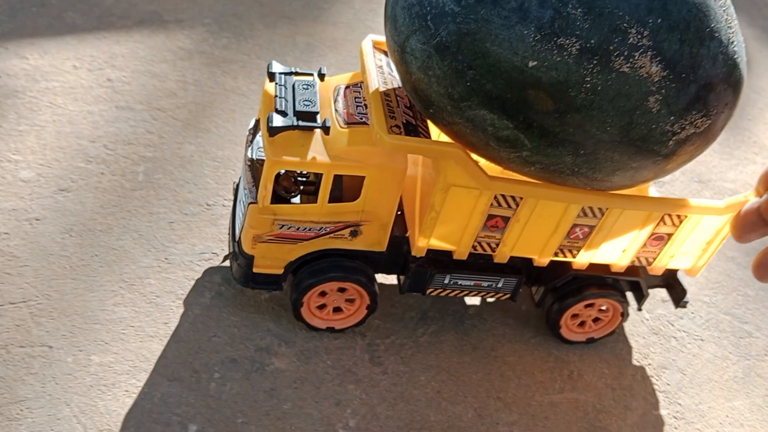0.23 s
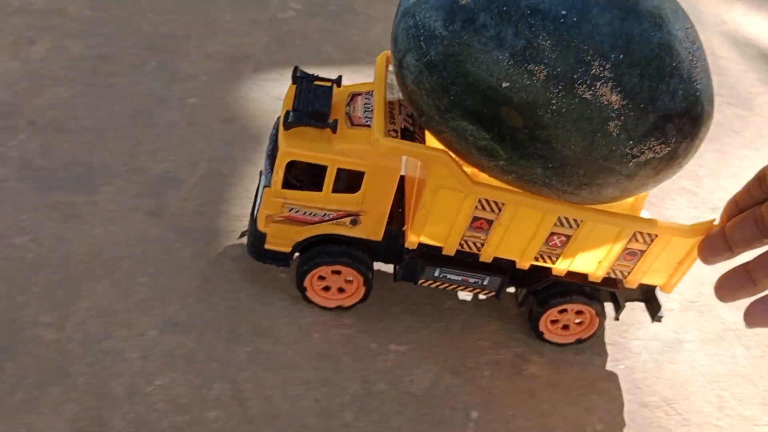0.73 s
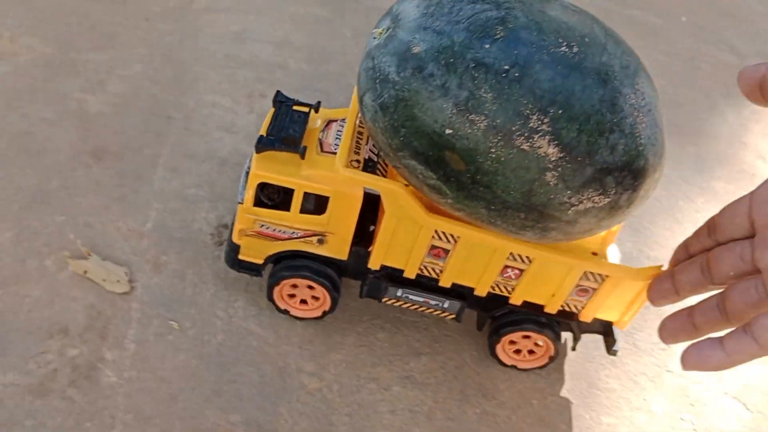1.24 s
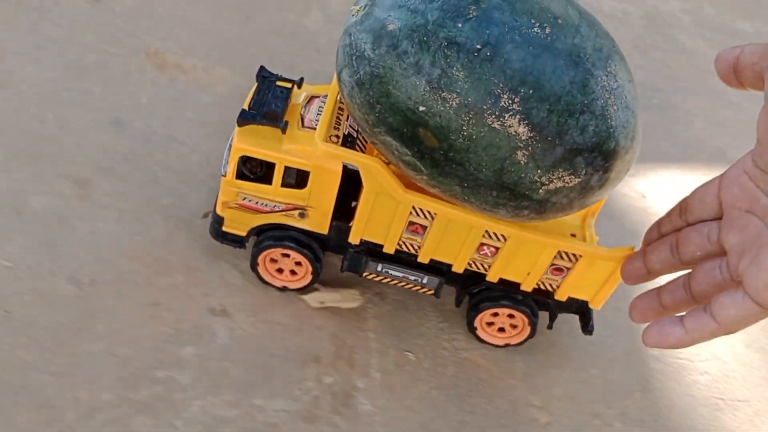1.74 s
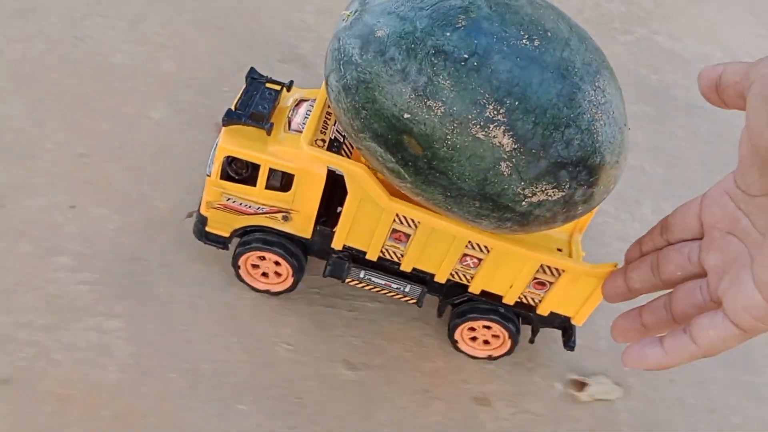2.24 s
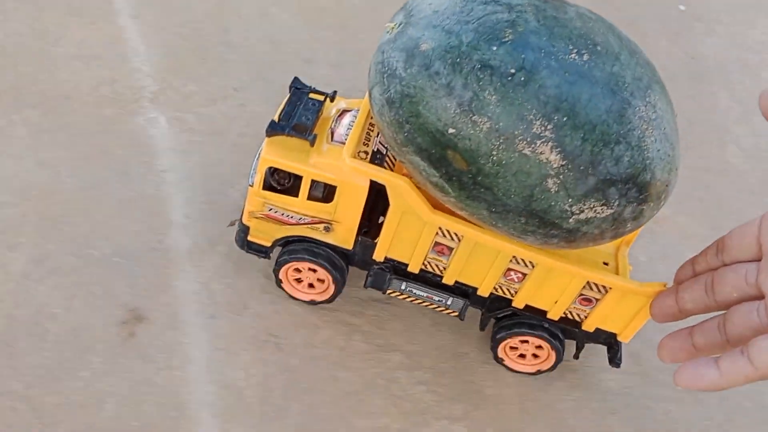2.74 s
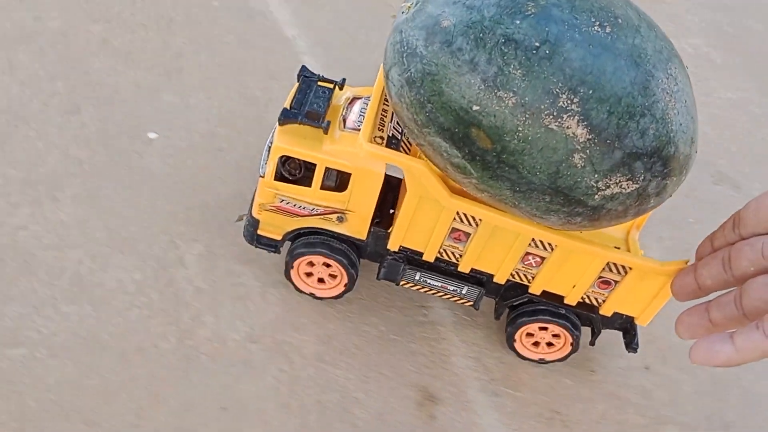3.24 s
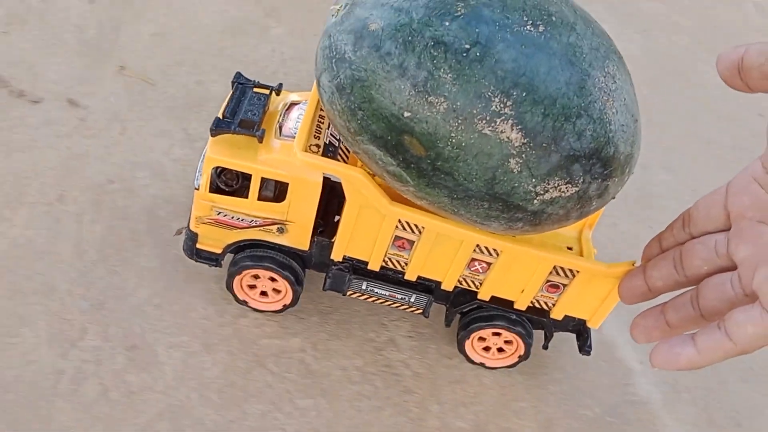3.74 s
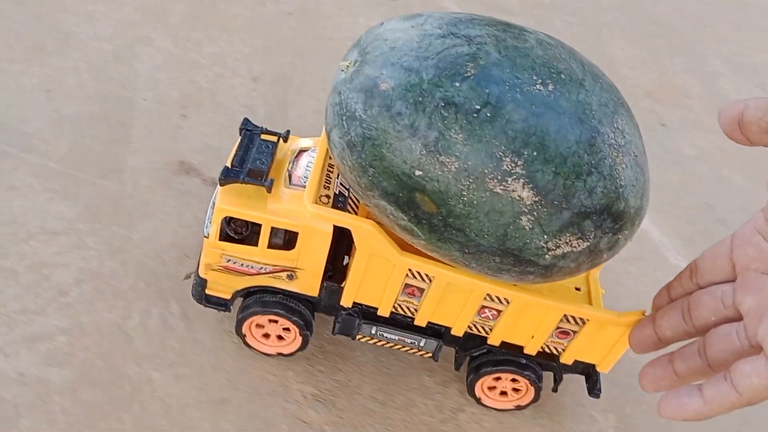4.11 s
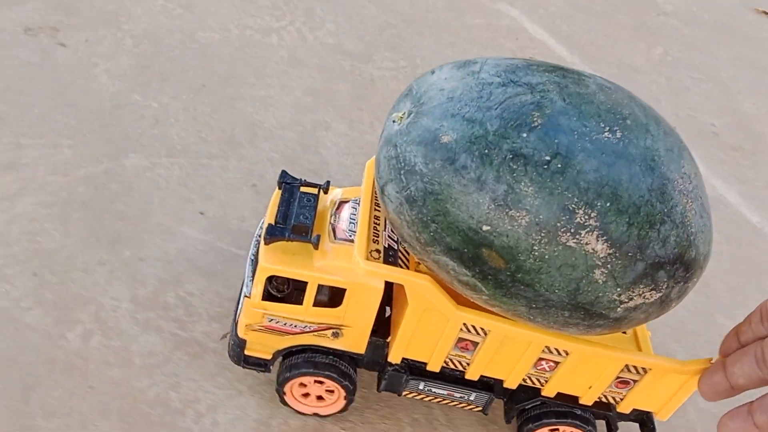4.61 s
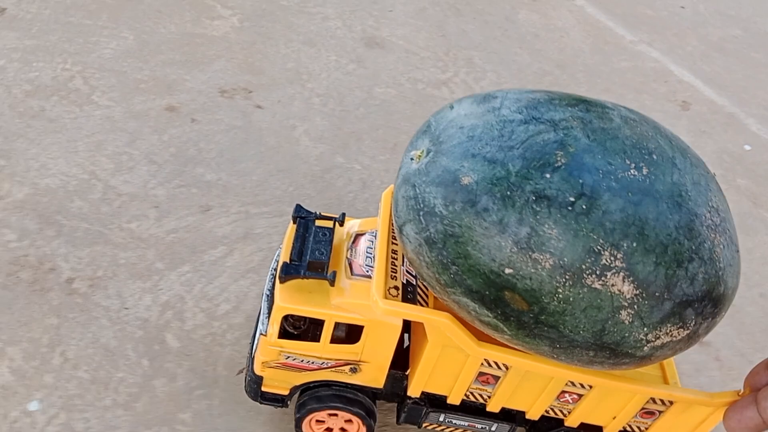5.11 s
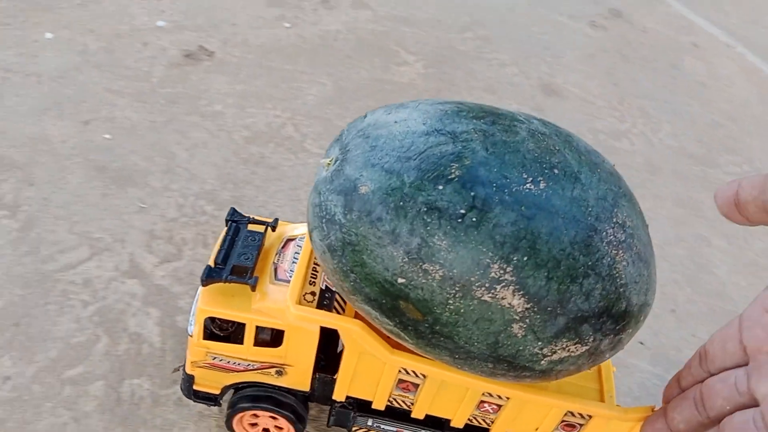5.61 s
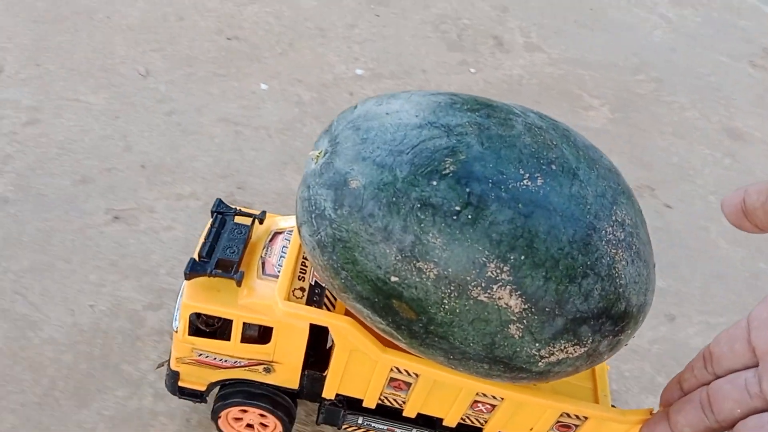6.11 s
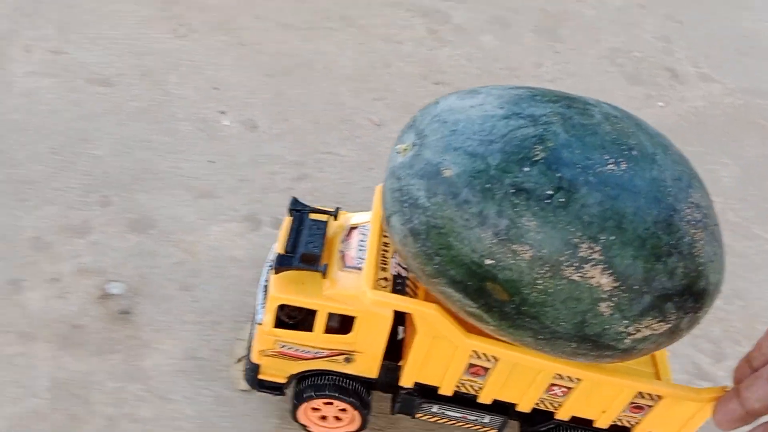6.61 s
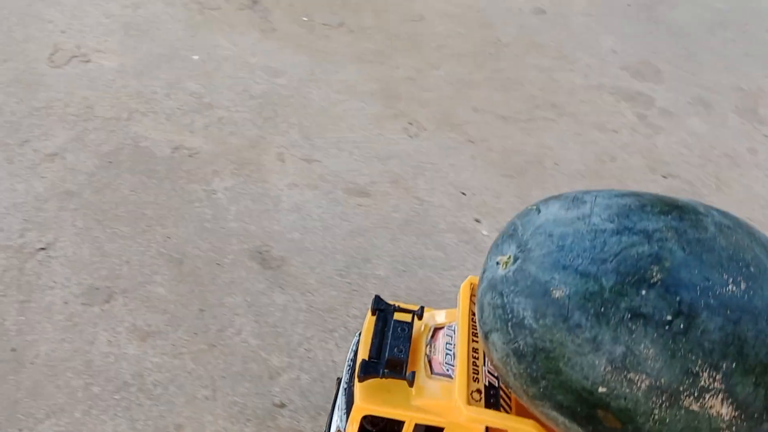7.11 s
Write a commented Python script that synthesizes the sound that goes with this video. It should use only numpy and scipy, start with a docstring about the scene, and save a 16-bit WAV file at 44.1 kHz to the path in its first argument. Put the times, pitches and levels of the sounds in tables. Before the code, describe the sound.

Rough, dry rolling of hard small wheels on sandy concrete, heard very close and mono. Several short scrapes and bumps come first, then over two seconds of nearly continuous clatter with tiny catches, a quiet gap with faint ticks, another second of strong rolling ending in a hard knock, and a few last scrapes. The hollow plastic body buzzes in the middle pitches, with quiet outdoor air behind.

```python
"""A loaded plastic toy truck is pushed by hand over gritty concrete, close to a phone, in short uneven runs.
Random jolts and single larger bumps ring the resonances of the wheels and the hollow body.
Sand crunches under the treads as shaped noise; single grains crack in short bursts.
Faint ticks of loose grains and quiet outdoor air, both shaped noise, fill the pauses."""
import sys
import numpy as np
from scipy import signal
from scipy.fft import rfft, irfft, next_fast_len
from scipy.io import wavfile
from scipy.ndimage import uniform_filter1d, map_coordinates

SR = 44100
rng = np.random.default_rng(int(sys.argv[2]) if len(sys.argv) > 2 else 0)


def master(y):
    """Save y as 16-bit WAV."""
    cut = np.clip(np.atleast_2d(y).T, -1, 1)
    pcm = np.round(cut * 32767)  # scale
    wavfile.write(sys.argv[1], SR, pcm.astype(np.int16))


def how_loud(loudness_db):
    """Turn decibels into a plain amplitude multiplier (0 dB gives 1, 20 dB gives 10)."""
    steps = np.asarray(loudness_db, float) / 20
    return 10 ** steps


N = 324135  # length in samples

# runs of rolling, and short quieter tails just after some of them:
# (start [s], length [s], level at full speed before pressure [dB], time to gather speed [s])
RUNS = [(0.0, 0.023, -40, 0.00037), (0.039, 0.021, -44, 0.0082), (0.064, 0.093, -38.5, 0.024),
        (0.171, 0.12, -44, 0.018), (0.263, 0.067, -36, 0.0093), (0.318, 0.1, -38, 0.044),
        (0.437, 0.27, -39, 0.026), (0.711, 0.025, -41, 0.011), (0.746, 0.17, -40, 0.013),
        (0.937, 0.13, -40.5, 0.031), (1.108, 0.1, -50.5, 0.031), (1.212, 0.068, -46.5, 0.032),
        (1.267, 0.24, -41, 0.027), (1.552, 0.05, -62.5, 0.0094), (1.636, 0.066, -40, 0.029),
        (1.802, 0.19, -46.5, 0.041), (1.995, 0.043, -59.5, .005), (2.051, 2.38, -39.5, 0.035),
        (4.431, 0.035, -52, 0.003), (4.53, 0.032, -63, 0.018), (4.634, 0.083, -50, 0.012),
        (4.894, 0.089, -50.5, 0.022), (4.996, 0.028, -56, 0.0077), (5.012, 1.051, -36.5, 0.11),
        (6.063, 0.087, -51.5, 0.006), (6.148, 0.29, -39, 0.03), (6.457, 0.036, -66, 0.0033),
        (6.599, 0.089, -58.5, 0.0086), (6.724, 0.29, -47, 0.02), (7.149, 0.14, -37, 0.067),
        (7.3, 0.069, -49, 0.01)]
# the wheels catch for a moment: (middle [s], drop [dB], length [s])
STALLS = [(1.49, 8.5, 0.036), (2.208, 8.5, 0.021), (2.425, 10, 0.017), (3.117, 13.5, 0.045),
          (3.64, 6, 0.025), (3.712, 12.5, 0.049), (3.883, 8, 0.02), (4.098, 10, 0.023), (5.805, 10, 0.026),
          (6.001, 9.5, 0.02)]
# how hard the truck is pressed, added to the rolling level: (time [s], change [dB])
PRESSURE = [(0, 1.5), (2.3, 3.5), (2.75, -0.5), (3.05, 1), (3.24, -2), (3.3, 3.5), (3.65, 3.5), (3.9, 2.5),
            (4.17, -3), (4.38, 0.5), (5.4, 0.5), (6.05, -0.5), (6.45, 1), (7.35, 3)]
# single larger bumps: (time [s], strength [dB])
KNOCKS = [(0.014, -28), (.049, -42), (.102, -37), (0.208, -38), (0.228, -35), (.251, -30), (0.41, -27),
          (0.416, -20.5), (.475, -22), (0.695, -20.5), (0.756, -30), (0.809, -24), (1.304, -27),
          (1.69, -37), (1.841, -44), (4.466, -55), (4.665, -37), (4.808, -50), (4.847, -46), (4.973, -31),
          (5.017, -53), (5.09, -50), (6.021, -33), (6.0575, -19), (6.121, -50), (6.146, -34), (6.183, -29),
          (7.182, -32.5), (7.224, -26)]

# resonances of each part: (pitch [Hz], width of one pass [Hz], relative strength [dB])
RUMBLE = [(76.8, 27, 10), (103.7, 19.4, 6), (142, 79, 5.5)]
FRAME = [(249.8, 52, 10)]
CHASSIS = [(349, 220, -8), (458, 270, -7), (499.4, 66.5, 9), (620.4, 133, 1.5)]
CAB = [(667, 94, -0.5), (735, 164, -2.7)]
WHEELS = [(963, 162, 0.99), (1091, 183, -2.6)]
BED = [(1228, 280, -0.47), (1345, 241, 1), (1515, 262, -3.5)]
PANELS = [(1727, 530, 1), (2087, 350, -3.2)]
TAILGATE = [(2292, 183, 6), (2487, 340, -4.5)]
SKIN = [(2730, 420, 2.5), (2960, 240, -1.5), (4046, 350, -9.5)]
FENDERS = [(3206, 237, 7.5), (3645, 250, -1.5), (4310, 570, -11)]

# usual share of a jolt taken by (frame [dB], chassis [dB], wheels [dB], bed [dB])
USUAL_SHARES = [-26.5, -12.5, -7, -3.5]
# slow changes of colour, added to the usual shares and to the sand:
# (time [s], lean from wheels to bed, applied in part [dB], frame [dB], chassis [dB], sand [dB])
COLOUR = [(0, -2, -3, -7, -3), (.12, -25, -18, -9, -4), (.22, 20, -5, -8, -3), (.4, 2, -9.5, -5, -3.5),
          (.6, 6.5, -6, -9.5, -1), (.85, 2, -15, -4, 0.5), (1.2, -8, -11, -7, -1.5),
          (1.45, -25, -6, -0.5, 0), (1.9, -22, -6, -9, 0.5), (2.2, 10.5, -8.5, -3, -1.5),
          (2.6, 7, -6.5, 8.5, 0), (3.0, -25, 9.5, -1, 0), (3.2, -15, -7, -1, -0.5), (3.6, 21.5, 3.5, 2, -2),
          (4.0, 4.5, 0, -2, -1), (4.4, -22, 9.5, 8.5, -1.5), (4.8, -9, -17, -15, -0.5),
          (5.15, 6, -10, 2, -2), (5.6, 17.5, 14, 1, -1), (5.95, -19, 7.5, 3, -2.5), (6.4, -28, 3, 2.5, 1),
          (6.63, -18, -16, 8.5, 5.5), (6.8, -8, 12, 4, 7.5), (7.05, 18, 3, 7.5, 5), (7.35, 19, 9, -6.5, 0)]
# share of the low rumble in a jolt: (time [s], share [dB])
RUMBLE_SHARE = [(0, -29), (.9, -37), (1.7, -40), (2.2, -26.5), (2.6, -33), (3.0, -17.5), (3.3, -45),
                (3.6, -25.5), (4.1, -37), (5.0, -17), (5.4, -30.5), (6.0, -20.5), (6.8, -17), (7.35, -41)]
# share of the cab, strong in the first runs, faint in the middle, strongest near 6.85 s: (time [s], share [dB])
CAB_SHARE = [(0, -13.5), (.7, -11.5), (1.2, -15), (2, -26), (6.5, -32), (6.85, -7.5), (7.35, -35)]
# shares of the upper parts: (time [s], panels [dB], tailgate [dB], fenders [dB])
UPPER_SHARES = [(0, -13.5, -21, -18.5), (1, -9, -14.5, -16), (1.6, -8.5, -5.5, -16.5),
                (2.2, -12, -9.5, -22.5), (2.8, -12.5, -9.5, -17.5), (3.05, -4.5, -8, -17.5),
                (3.5, -15.5, -10.5, -21), (4.3, -10, -9.5, -16.5), (4.7, -8, -9, -17),
                (4.95, -4.5, -17.5, -14.5), (5.5, -13.5, -9.5, -17), (6.1, -9, -13.5, -19),
                (6.4, -5, -11.5, -19), (6.65, -0.5, -2.5, -6), (6.9, -0.5, -7, -10),
                (7.35, -12.5, -19.5, -21)]
# random swing of each part in the order used in body(); low parts knock in lumps: (swing [dB], ...)
LUMPS_DB = [4.3, 3.9, 4.2, 4.0, 0.84, 0.88, 1.33, 1.2, 2.4, 2.36]

# colour of the sand: (pitch [Hz], relative level [dB])
SAND_COLOUR = [(3100, -3), (5200, -6.5), (5800, -5), (6350, -7.5), (6700, 2.5), (8500, -1), (10300, 6),
               (11200, 0), (11800, 1.5), (13200, 0.5), (14000, -16), (15400, -4.5)]
# extra brightness of the crunches: (pitch [Hz], relative level [dB])
CRUNCH_COLOUR = [(7000, 2.5), (11500, 7.5)]
# grains that crack: (time [s], strength [dB], brightest pitch [Hz])
CRACKS = [(0.3935, -41, 10000), (0.578, -30.5, 8640), (0.599, -33, 6600), (0.6843, -29, 7300),
          (1.302, -29, 12300), (1.3628, -36, 11700), (1.787, -36.5, 8600), (2.436, -34, 10300),
          (2.615, -28, 12000), (2.68, -16, 12800), (2.7953, -29, 7600), (3.018, -32, 10900),
          (3.217, -24, 11200), (3.898, -35, 10500), (4.551, -25.5, 7560), (4.722, -36, 7800),
          (5.473, -30, 12500), (5.479, -22.5, 7800), (5.488, -23.5, 7040), (5.821, -35, 10100),
          (6.003, -34, 10300), (6.331, -21.5, 11700), (6.633, -30.5, 12500), (7.206, -30, 12600)]
# colour of the cracks: (pitch [Hz], gain [dB])
CRACK_COLOUR = [(2000, -21), (4000, -40), (4800, -9), (5500, -10.5), (7200, -4.0), (15000, -10.5)]
# colour of the ticks: (pitch [Hz], relative level [dB])
TICK_COLOUR = [(500, -12), (1700, 3.0), (3300, -17), (6500, -22), (9000, 0), (12500, -3.5), (15000, -14)]
# colour of the air: (pitch [Hz], relative level [dB])
AIR_COLOUR = [(24, -14), (40, 0), (126, 5), (343, -9), (1580, -4.5), (5230, -70), (6550, -50),
              (7060, -13.5), (9060, -13), (12500, -22), (15700, -27)]

USUAL_ROLLING_DB = -41.5  # the rolling level at which sand and skin have their usual strength
SAND_DB, SAND_FOLLOWS = -61.5, 0.95  # usual sand setting, dB per dB of rolling


def unit(x):
    """Scales x to an rms (average strength) of 1."""
    return x / np.sqrt(np.mean(x ** 2) + 1e-20)


def curves(rows):
    """Joins timed points by lines: one curve for each column after the time."""
    s, *cols = np.transpose(rows)
    return [np.interp(np.arange(N) / SR, s, c) for c in cols]


def wobble(rate):
    """A smooth random curve of rms 1 with rate knots a second."""
    knots = rng.standard_normal(N // 100)
    return unit(map_coordinates(knots, [np.arange(N) * rate / SR]))


def filtered(x, response):
    """Multiplies the spectrum of x by a response that depends on frequency."""
    m = next_fast_len(N + 8192)  # spare room for the ringing
    return irfft(rfft(x, m) * response(np.fft.rfftfreq(m, 1 / SR)), m)[:N]


def coloured(x, points):
    """Filters x through (pitch [Hz], gain [dB]) points joined on a log pitch axis."""
    f, db = np.transpose(points)
    return filtered(x, lambda hz: how_loud(np.interp(np.log(hz + 1), np.log(f), db)))


def patches(x, size, hz_bins, frames, depth_db):
    """Makes x uneven with a random field of gain over pitch and time."""
    z = signal.stft(x, nperseg=size)[2]
    field = rng.standard_normal(z.shape)
    field = uniform_filter1d(field, size=hz_bins, axis=0)
    field = uniform_filter1d(field, size=frames, axis=1)
    return signal.istft(z * how_loud(depth_db * unit(field)), nperseg=size)[1][:N]


def impacts(per_second, spread_db):
    """Random single-sample hits: most are small, a few are much larger."""
    when, size, sign = rng.random((3, N))
    sizes = how_loud(-spread_db * np.log(size + 1e-4))
    return (when < per_second / SR) * sizes * np.sign(sign - .5)


def rolling():
    """Rolling level in dB: each row of RUNS builds up and then falls fast; it drops where the wheels catch."""
    t = np.arange(N) / SR
    power = how_loud(-73 + 4 * wobble(23)) ** 2  # wandering level at rest
    for s, length, full_db, gather in RUNS:
        near = slice(max(0, round(s * SR)), round((s + length + .3) * SR))
        speed = 1 - np.exp(-np.clip(t[near] - s, 0, length) / gather)
        since_end = np.maximum(t[near] - s - length, 0)
        fall = how_loud(-1052 * since_end)  # dB per second
        rattle = how_loud(-32.5 - 390 * since_end)  # the load rattles on after a stop
        power[near] += (speed ** 2.41 * how_loud(full_db) * (fall + rattle)) ** 2
    level_db = 10 * np.log10(power) + curves(PRESSURE)[0]
    for s, drop_db, length in STALLS:
        near = slice(max(0, round((s - .1) * SR)), round((s + .1) * SR))
        # the fourth power gives the dip a flat bottom
        level_db[near] -= drop_db * np.exp(-.7 * (2 * (t[near] - s) / length) ** 4)
    return level_db


def knocks():
    """Each larger bump gives the truck one sharp blow with a short, fading judder behind it."""
    blows, t = np.zeros(N + SR), np.arange(SR // 80) / SR
    judders = rng.standard_normal((len(KNOCKS), len(t)))
    for (s, db), judder in zip(KNOCKS, judders):
        blow = np.where(t > 0, 0.072 * judder, 1) * np.exp(-t / 0.0031)
        blows[round(s * SR):][:len(t)] += how_loud(db + 11) * blow  # the blow is larger than the ring it starts
    return blows[:N]


def modes(part):
    """A part's resonances, each applied twice for steep sides; neighbours swing in opposite phase."""
    norm = np.sqrt(sum(how_loud(db) ** 2 * width for hz, width, db in part))

    def mode(sign, hz, w, db):
        return lambda f: sign * how_loud(db) / norm * (1j * f * w / (hz * hz - f * f + 1j * f * w)) ** 2

    return [mode((-1) ** k, *row) for k, row in enumerate(part)]


def body(rolling_db, shares_db):
    """Bumps jolt all parts at once; as wheels turn and the load rocks, the resonances drift in strength."""
    jolts = unit(impacts(900, spread_db=1.0)) + 0.6 * rng.standard_normal(N)
    jolts = patches(jolts, size=1024, hz_bins=2, frames=12, depth_db=2.8)
    jolts = unit(patches(jolts, size=1024, hz_bins=2, frames=4, depth_db=2))
    usual = how_loud(41.5) * np.sqrt(sum(how_loud(db) ** 2 for db in shares_db))

    parts = [RUMBLE, FRAME, CHASSIS, WHEELS, BED, CAB, PANELS, TAILGATE, FENDERS, SKIN]
    shares_db = [db + lump_db * wobble(11) for db, lump_db in zip(shares_db, LUMPS_DB)]
    rings = []
    for part, share_db in zip(parts, shares_db):
        for mode in modes(part):
            gain = how_loud(share_db + 2 * wobble(16))  # each resonance also swells alone as the load shifts
            rings.append((mode, gain))

    def ring(x):
        return sum(filtered(x * gain, mode) for mode, gain in rings)

    # hold back part of the loudness swell, so the drift changes colour more than loudness
    swell = np.sqrt(np.abs(uniform_filter1d((ring(jolts) / usual) ** 2, size=round(0.048 * SR))))
    jolts = jolts + 0.85 * unit(impacts(450, spread_db=2.2))  # coarse grains strike sharply
    jolts = jolts * (unit(swell) + 0.12) ** -0.7 * how_loud(0.78 * wobble(110))
    return how_loud(38.5) * ring(jolts * how_loud(rolling_db) + knocks())


def crunches():
    """Tread lugs bite at uneven gaps; each bite is a short puff of noise from shearing sand."""
    t = np.arange(SR // 50) / SR
    lugs = np.zeros(N)
    gap, size = rng.gamma(3, size=(2, 1500))  # gaps seldom come close to zero
    when = np.cumsum(gap * 0.0041 * SR).astype(int)
    lugs[when[when < N]] = np.minimum(size[when < N], 6)
    puff = (t / .0016) * np.exp(-t / 0.0017)
    puffs = unit(signal.fftconvolve(lugs, puff)[:N])
    noise = patches(rng.standard_normal(N) * puffs, size=128, hz_bins=5, frames=4, depth_db=3)
    return unit(coloured(noise, CRUNCH_COLOUR))


def sand(level_db):
    """A steady scrape of noise under short, brighter crunches, each with its own colour."""
    bright_crunches = crunches()
    scrape = patches(rng.standard_normal(N), size=512, hz_bins=3, frames=16, depth_db=2.4)
    grit = unit(scrape) + 1.23 * bright_crunches
    low = filtered(grit, lambda hz: hz < 6500)
    # the part below 6500 Hz gets strong random patches of gain and falls faster as the level drops
    patchy_low = unit(patches(low, size=256, hz_bins=1, frames=24, depth_db=5))
    low_gain = how_loud(0.64 * (level_db - SAND_DB)) * np.std(low)
    grit = grit - low + low_gain * patchy_low
    return how_loud(level_db + 2.5) * unit(coloured(grit, SAND_COLOUR))


def cracks():
    """A grain splits in a noise burst of a few milliseconds, stressed near its own pitch."""
    out, t = np.zeros(N + SR), np.arange(SR // 40) / SR
    shape = unit((t / .001) * np.exp(-t / 0.002))
    noise = rng.standard_normal((len(CRACKS), 2, len(t)))
    for (s, db, hz), (broad, narrow) in zip(CRACKS, noise):
        b, a = signal.iirpeak(min(hz, SR / 2.2), 7, SR)
        burst = 0.79 * unit(broad) + unit(signal.lfilter(b, a, narrow))
        out[round(s * SR):][:len(t)] += how_loud(db - 25) * shape * burst
    return coloured(out[:N], CRACK_COLOUR)


def ticks():
    """Loose grains shift under the wheels: faint bright ticks of noise, heard in the pauses."""
    t = np.arange(SR // 200) / SR
    hits = np.abs(impacts(90, spread_db=3.0))
    puffs = signal.fftconvolve(hits, t / .001 * np.exp(-t / 0.00066))[:N]
    return how_loud(-73) * unit(coloured(puffs * rng.standard_normal(N), TICK_COLOUR))


def air():
    """Outdoor hush and the microphone's own hiss, as one gently wavering noise."""
    level = how_loud(-74 + 1.5 * wobble(29.0))
    hush = patches(rng.standard_normal(N), size=512, hz_bins=8, frames=10, depth_db=3.0)
    return level * unit(coloured(hush, AIR_COLOUR))


def scene():
    """The truck and the air around it; sand follows the rolling a little less steeply than the body."""
    rolling_db = rolling()
    lean_db, frame_db, chassis_db, sand_change_db = curves(COLOUR)
    changes_db = [frame_db, chassis_db, -0.24 * lean_db, 0.16 * lean_db]  # wheels fall as the bed rises
    middle_db = [usual + change for usual, change in zip(USUAL_SHARES, changes_db)]
    over_usual_db = rolling_db - USUAL_ROLLING_DB
    skin_db = -19.5 + 0.25 * over_usual_db  # thin walls buzz more at speed
    shares_db = curves(RUMBLE_SHARE) + middle_db + curves(CAB_SHARE) + curves(UPPER_SHARES) + [skin_db]
    sand_db = SAND_DB + sand_change_db + SAND_FOLLOWS * over_usual_db
    truck = body(rolling_db, shares_db) + sand(sand_db) + cracks() + ticks()
    return (truck + air())[None]


def top_cut(x):
    """Nothing passes above the cut-off."""
    return signal.sosfilt(signal.butter(12, 16460, fs=SR, output="sos"), x)


def record(dry):
    """The phone's port has a narrow hollow near 4900 Hz and a bass cut; all is cut sharply above 15500 Hz."""
    def response(f):
        hollow = 1 - .9 * np.exp(-((f - 4900) / 260) ** 2)
        bass_cut = f ** 2 / (f ** 2 + 48 ** 2)
        sharp_cut = np.where(f < 15500, 1, how_loud(-36))
        return hollow * bass_cut * sharp_cut

    mix = filtered(dry[0], response)[None]
    return top_cut(mix)


dry = scene()
out = record(dry)
master(out)
```